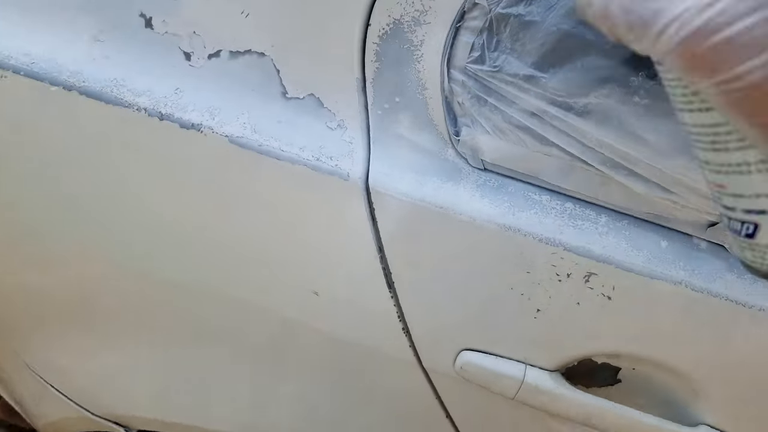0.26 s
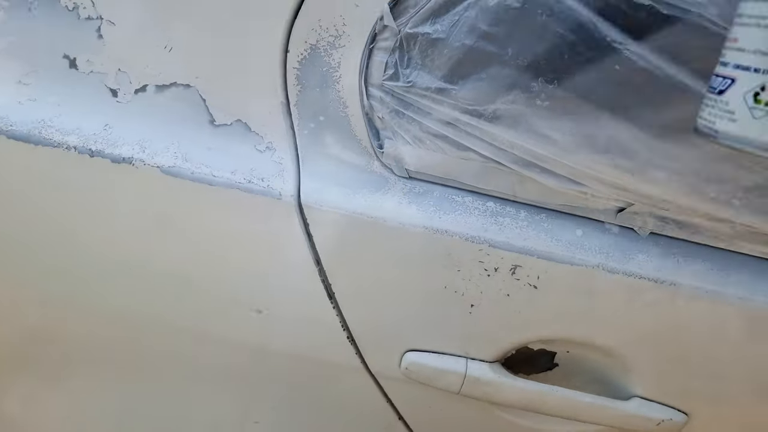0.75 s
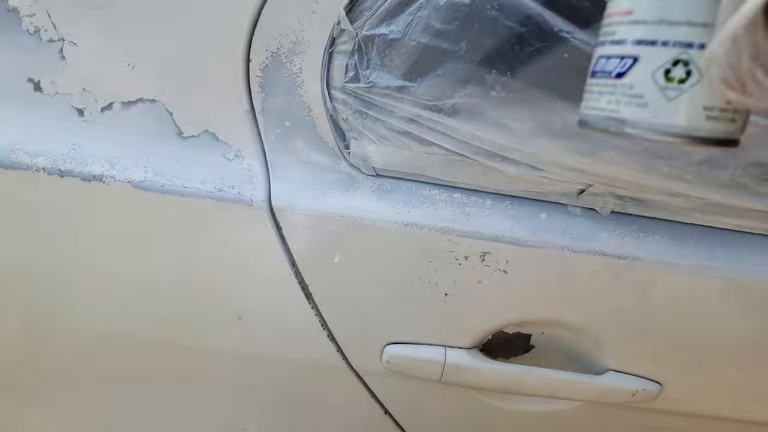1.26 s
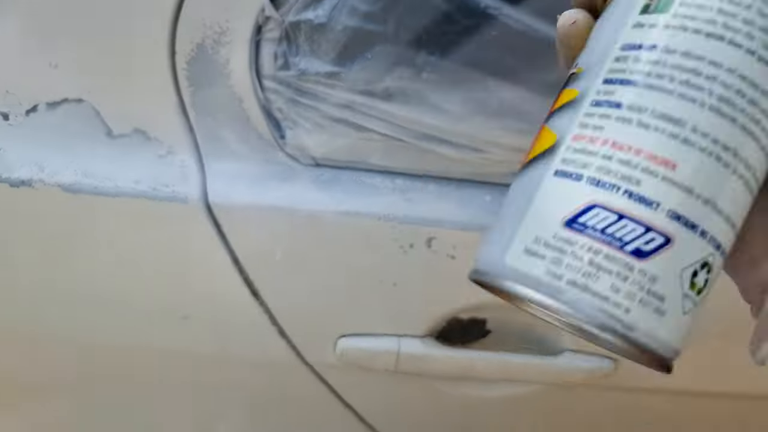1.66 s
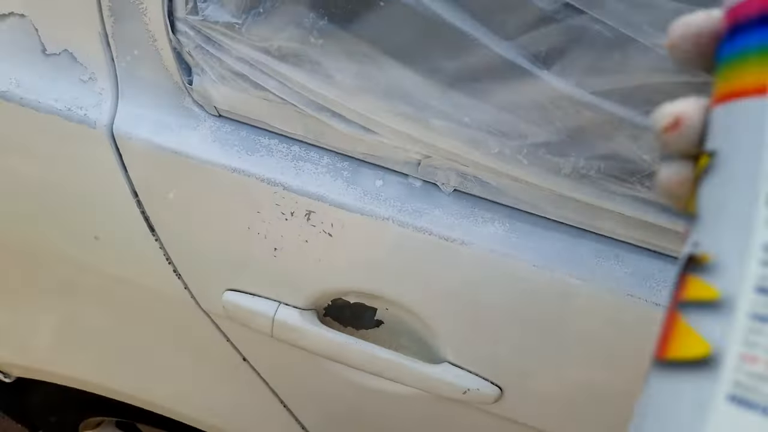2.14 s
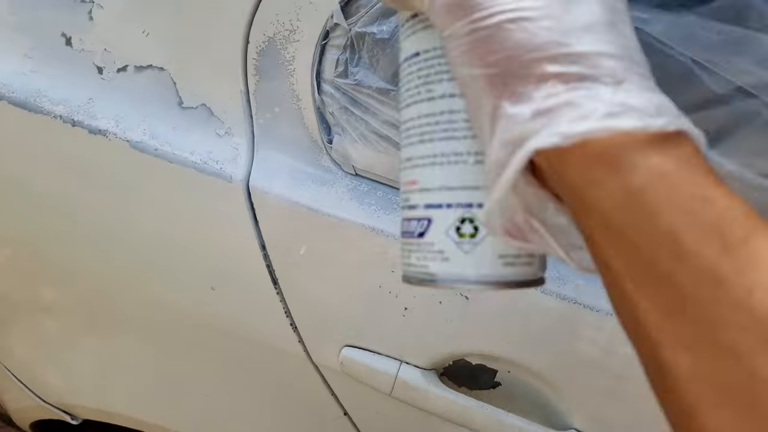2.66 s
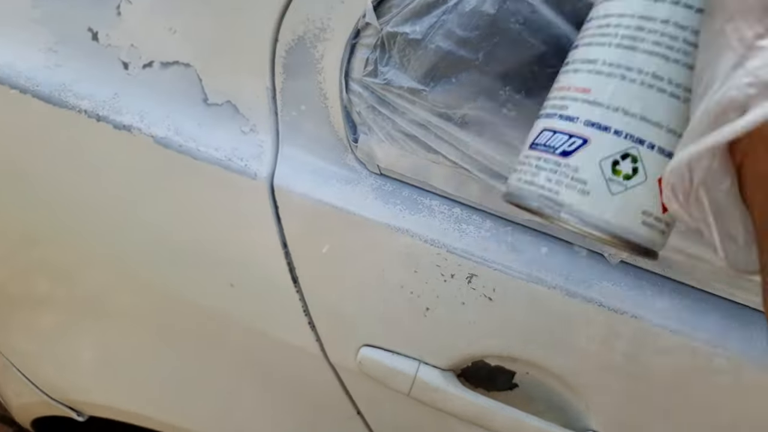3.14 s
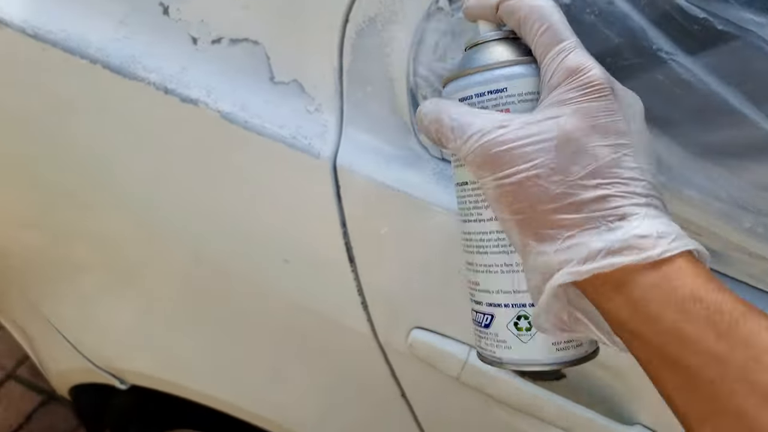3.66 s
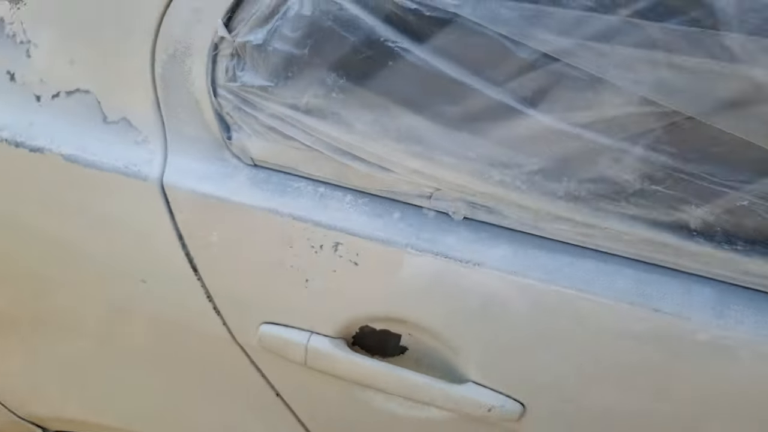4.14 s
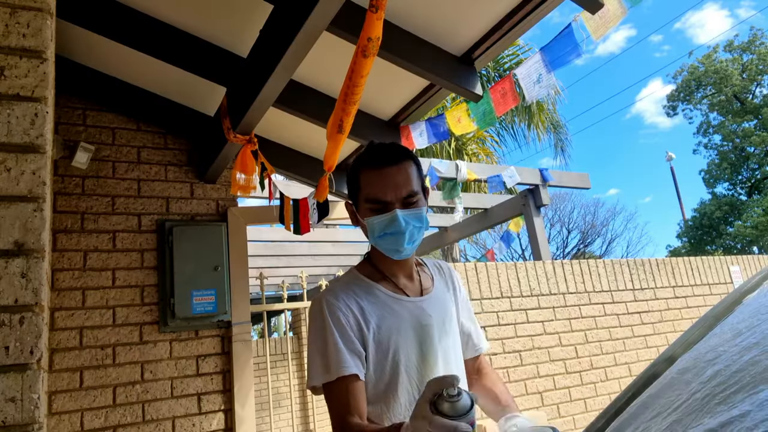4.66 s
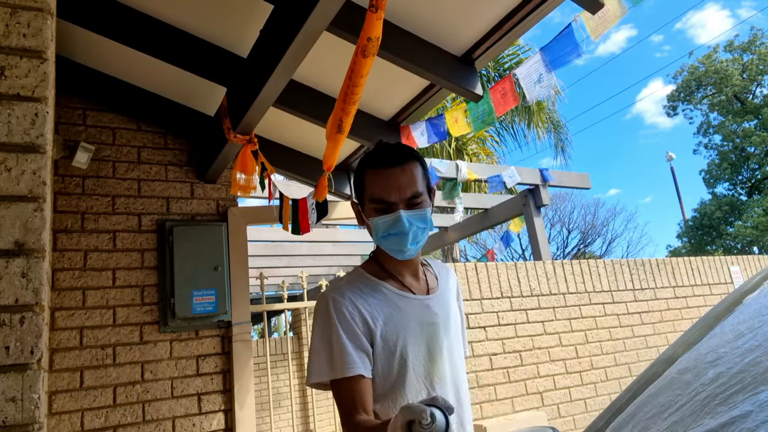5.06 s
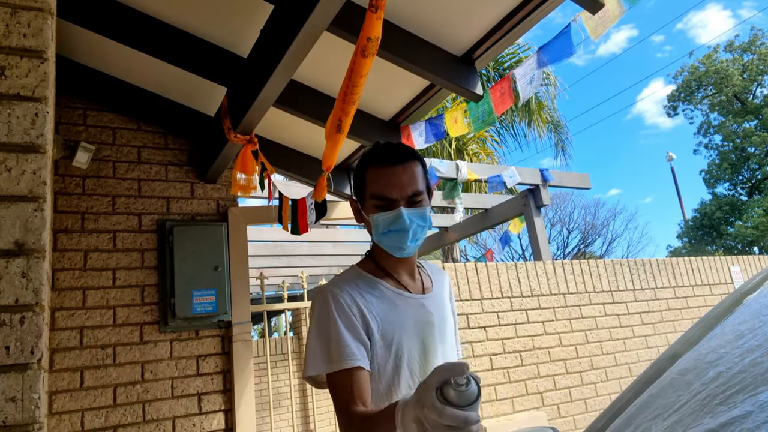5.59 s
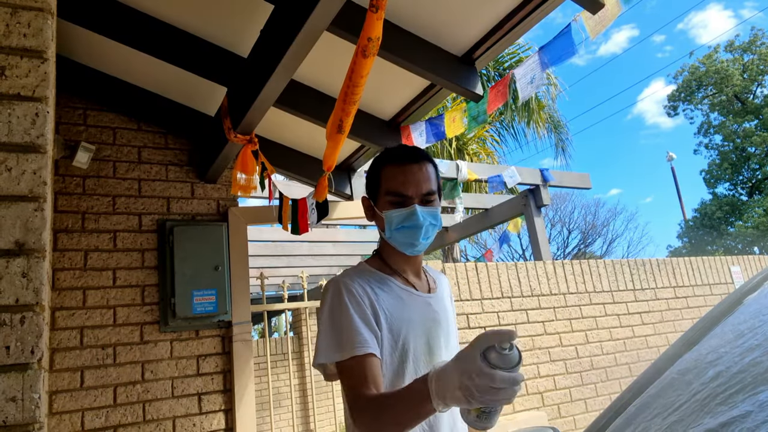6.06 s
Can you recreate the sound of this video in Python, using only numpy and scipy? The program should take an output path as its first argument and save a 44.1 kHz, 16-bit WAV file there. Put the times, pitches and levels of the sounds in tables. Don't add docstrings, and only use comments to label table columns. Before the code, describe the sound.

Hard metallic ticks of a loose ball and quick bursts of bright hiss from an aerosol can, then duller, more distant strokes and two soft panel knocks.

```python
import sys
import numpy as np
from scipy import signal
from scipy.io import wavfile
from scipy.ndimage import uniform_filter1d

SR = 44100
rng = np.random.default_rng(int(sys.argv[2]) if len(sys.argv) > 2 else 0)


def gain_from_db(level_db):
    decades = np.asarray(level_db, float) / 20
    return 10 ** decades


def unload_wav(signal):
    wavfile.write(
        sys.argv[1],
        SR,
        np.round(np.clip(np.atleast_2d(signal).T, -1, 1) * 32767).astype(np.int16),
    )


N = 278712
CUT_S = 4.315

# frequency in Hz, density in dB per Hz.
NEAR_HISS = [(410, -44), (700, -22.5), (1690, -14), (2010, -18), (2760, -9), (2990, -17), (4160, -10),
             (5070, -7), (6430, -11), (7940, -5.5), (9060, -17.5), (14400, 2.5), (15800, -8.5),
             (16400, -51)]
# frequency in Hz, density in dB per Hz.
FAR_HISS = [(410, -38), (700, -10.5), (1570, -14.5), (2120, -11), (2690, -4), (3460, -7.5), (4380, -3),
            (6100, -10), (7630, -4), (9060, -10.5), (13500, 3.5), (15800, -2.5), (16400, -61)]
# frequency in Hz, share of the left-right difference.
SHADOW = [(1000, 0.045), (3000, -0.098), (5000, 0.23), (9000, -0.032), (13000, 1.)]
# start in seconds, end in seconds, hiss level in dB.
QUICK_STROKES = [(0.289, 0.357, -32.5), (0.466, 0.548, -32.5), (0.639, 0.72, -36.5), (0.809, 0.895, -35.5),
                 (1.004, 1.044, -36), (1.15, 1.232, -34.5), (1.307, 1.391, -34.5), (1.487, 1.584, -37)]
SLOWER_STROKES = [(2.544, 2.613, -38), (2.72, 2.818, -39), (2.926, 3.019, -37.5), (3.13, 3.224, -38),
                  (3.327, 3.429, -37.5), (3.569, 3.632, -36.5), (3.764, 3.852, -34.5), (3.963, 4.045, -35)]
# start in seconds, end in seconds, hiss level in dB.
DISTANT_STROKES = [(4.734, 4.799, -43), (4.88, 4.964, -42.5), (5.08, 5.176, -40.5), (5.256, 5.35, -43),
                   (5.443, 5.51, -42.5), (5.607, 5.677, -43.5), (5.756, 5.838, -43.5),
                   (5.931, 6.013, -43.5), (6.103, 6.192, -44.5), (6.278, 6.322, -46)]
# start in seconds, end in seconds, level in dB.
RUSTLES = [(0.984, 0.997, -56), (1.698, 1.72, -66), (2.17, 2.306, -67.5), (2.645, 2.672, -61.5),
           (3.875, 3.925, -59), (4.462, 4.575, -57), (4.585, 4.722, -63), (5.424, 5.44, -51)]

# time in seconds, peak in dB, strongest ring in Hz, left-right difference in dB.
BLOWS = [(0.0245, -12, 7580, 6), (0.03, -17, 5370, -1), (0.1167, -17, 4040, 0.5), (0.173, -8, 1610, 8.5),
         (0.231, -16.5, 4120, 8.5), (0.3784, -18, 5230, 2), (0.8066, -10, 2440, 14.5),
         (0.8497, -18.5, 4280, -3), (1.007, -16, 4430, 1.5), (1.3262, -17, 5330, -22.5),
         (1.3346, -15, 6000, 3.5), (1.6415, -5.5, 4730, 4.5), (1.645, -18, 3100, 7), (1.7675, -10, 1720, 3),
         (1.772, -22.5, 1700, 3), (1.87, -19.5, 2460, 4), (1.8924, -9, 4100, 5.5),
         (1.9692, -16.5, 4010, 12), (2.3143, -7.5, 4344, 10.5), (2.3216, -11, 2680, -2),
         (2.381, -14.5, 5800, -1), (2.386, -21, 4700, -10), (2.406, -11, 2400, 10.5),
         (2.8421, -7, 4620, 4.5), (3.0565, -7.5, 4230, 6.5), (3.2686, -10.5, 4860, 8),
         (3.588, -14, 4940, -5.5), (3.6514, -18.5, 4370, 2), (3.858, -10, 7840, -6),
         (4.0908, -15.5, 4590, 8)]
# time in seconds, peak in dB, strongest ring in Hz.
TAPS = [(0.191, -30.5, 2480), (0.2594, -21.5, 2480), (0.3516, -22, 7550), (0.3657, -23, 2260),
        (0.5198, -17, 5480), (0.5346, -23.5, 2590), (0.8912, -22.5, 4240), (0.92, -24, 4170),
        (0.9855, -30.5, 2260), (1.1497, -20.5, 2360), (1.166, -21.5, 2370), (1.1945, -24, 7250),
        (1.307, -27, 3360), (1.705, -26.5, 1320), (1.829, -20.5, 1850), (1.8893, -31, 4000),
        (1.9986, -29, 1390), (2.0152, -20.5, 5080), (2.5414, -19.5, 2280), (2.568, -26, 2360),
        (2.6018, -22.5, 1510), (2.7578, -24, 4460), (2.788, -21, 7820), (2.9447, -26.5, 1330),
        (3.0927, -23, 2420), (3.4416, -26.5, 4640), (3.6104, -20, 1700), (3.643, -27, 6000),
        (4.123, -30.5, 1700)]
# time in seconds, peak in dB.
TOUCHES = [(0.5764, -39), (0.5864, -38), (0.5954, -37), (1.0597, -29), (1.094, -42), (1.398, -28.5),
           (1.7109, -29.5), (1.929, -32), (2.1944, -35), (2.437, -29), (2.658, -35.5), (2.69, -41),
           (3.693, -31.5), (3.707, -33.5), (3.7327, -32.5), (4.159, -33.5), (4.189, -36), (4.3059, -31.5)]
# time in seconds, peak in dB, strongest ring in Hz.
FAR_TICKS = [
    (5.219, -34.5, 7450),
    (5.3432, -26, 4620),
    (5.458, -24, 2820),
    (5.5873, -18, 5030),
    (5.593, -25, 2970),
    (5.7298, -30.5, 3780),
]
# frequency in Hz, level in dB, 60 dB decay in seconds.
TIN_MODES = [(2500, 0, .005), (3400, -3, .005), (4400, -1, .004), (5300, -2, .004), (6500, -4, .004),
             (7700, -4, .003)]
# time in seconds, level in dB, pitch in Hz.
SQUEAK = [
    (2.355, -51, 3200),
    (2.361, -33, 3260),
    (2.372, -34, 3570),
    (2.38, -34, 3200),
]
# time in seconds, peak in dB, left-right difference in dB.
KNOCKS = [
    (4.929, -20.5, 1),
    (5.0966, -14, 1.5),
]
# frequency in Hz, level in dB, 60 dB decay in seconds.
PANEL_MODES = [(263, -8, 0.027), (320, -6, 0.045), (453, 0, 0.029), (526, -2.5, 0.025), (623, -5, 0.017),
               (800, -5, 0.016), (1060, -2.5, 0.017), (1280, 0, 0.0089), (1700, -4.5, 0.0092),
               (2220, -4, 0.013), (2590, -7.5, 0.012), (3295, -4.5, .008)]

# frequency in Hz, density in dB per Hz.
RUMBLE = [(12, -34.5), (20, -20.5), (38, -4.5), (54, 2), (97, -7.5), (161, -17), (221, -17), (274, -35),
          (330, -43.5), (430, -54), (730, -120)]
# frequency in Hz, density in dB per Hz.
AIR = [(120, -23), (200, -9.5), (485, -16), (639, -20), (812, -20), (1070, -18), (1310, -19), (1490, -19.5),
       (2500, -23), (4040, -31.5), (10700, -43.5), (15200, -44), (16400, -67)]
# time in seconds, level in dB.
TRAFFIC_BEFORE = [(0.0, -33.5), (0.3, -32.5), (2.4, -29.5), (2.7, -35), (3.0, -29.5), (4.31, -30.7)]
TRAFFIC_AFTER = [(4.33, -45.5), (4.402, -35), (4.944, -33.5), (6.286, -38), (6.32, -36.5)]
# frequency in Hz, left-right correlation.
LIKENESS = [(60, 0.94), (180, 0.96), (550, 0.52), (1650, -0.34), (4970, 0.28), (15000, -0.48)]
# time in seconds, level in dB.
DRONE = [
    (1.7, -57),
    (2.05, -55),
    (2.6, -51.5),
    (2.8, -74),
]

NEAR_LAG, FAR_LAG = 13.2, 4.97
NO_BASS = signal.butter(4, 1100, "high", fs=SR, output="sos")


def hiss():
    def level_db(hz, t):
        body = np.clip((10500 - hz) / 2000, 0, 1)
        shapes = []
        for spectrum in (NEAR_HISS, FAR_HISS):
            top_shape = unit(spectrum, hz, 11900, 16000)
            body_shape = unit(spectrum, hz, 2500, 6200)
            shapes.append((1 - body) * top_shape + body * body_shape)
        power = np.full((2, len(hz), len(t)), 1e-14)
        for stroke in strokes():
            s, *columns = np.transpose(outline(*stroke))
            on = (t > s[0]) & (t < s[-1])
            top_db, body_db, pan_db = (np.interp(t[on], s, c) for c in columns)
            mid_db = top_db + body * body_db
            side_db = pan_db * read(SHADOW, hz) / 2
            power[:, :, on] += gain_from_db(2 * np.array([mid_db + side_db, mid_db - side_db]))
        return 10 * np.log10(power) + np.where(t < CUT_S, *shapes) + 6.68
    return field(256, level_db, lambda hz: 0.25 + 0 * hz, port_delay, patchy_db=3.0, flicker_db=1.82)


def strokes():
    bouts = [  # rows, swell over the stroke dB, body against the top dB, left-right dB
        (QUICK_STROKES, -1.7, -5.6, -12.5),
        (SLOWER_STROKES, 1.4, -5, -11.5),
        (DISTANT_STROKES, -3, -4, 5.2),
        (RUSTLES, 0.3, 3, 2.1)]
    return [(start, end, db - swell / 2, db + swell / 2, body_db, pan_db)
            for rows, swell, body_db, pan_db in bouts for start, end, db in rows]


def outline(start, end, first_db, last_db, body_db, pan_db):
    # drop time s, drop dB, end time s, end dB
    wisp = (0.014, -31.5, 0.11, -49) if start < CUT_S else (-0.05, -12.5, 0.11, -40)
    drop_s, drop_db, gone_s, gone_db = wisp
    return [(start - 0.009, first_db - 45, body_db - 1, pan_db),
            (start - 0.004, first_db - 12.5, body_db + 6.0, pan_db),
            (start + 0.002, first_db, body_db, pan_db),
            (end - 0.004, last_db, body_db, pan_db),
            (end + drop_s, last_db + drop_db, body_db + 10.5, 0.4 * pan_db),
            (end + gone_s, last_db + gone_db, body_db - 1.5, 0.29 * pan_db)]


def port_delay(hz, t):
    near, far = (np.exp(-2j * np.pi * hz * lag / SR) for lag in (NEAR_LAG, FAR_LAG))
    return np.where(t < CUT_S, near, far)


def hits():
    out = [(s, db, hz, -5.5, -19, pan_db, NEAR_LAG) for s, db, hz, pan_db in BLOWS]
    out += [(*row, -9, -21, 2, NEAR_LAG) for row in TAPS]
    out += [(*row, rng.uniform(1190, 2880), -21, -19, -4, NEAR_LAG) for row in TOUCHES]
    out += [(s, db, rng.uniform(4000, 7600), -8, -8, 2, NEAR_LAG)
            for s, end, db in QUICK_STROKES + SLOWER_STROKES]
    return out + [(*row, -34, -19, 3.5, FAR_LAG) for row in FAR_TICKS]


def tick(peak_db, hz, low_db, top_db, pan_db, lag):
    t = np.arange(800) / SR
    common, *own = rng.standard_normal((3, len(t)))
    fall = np.exp(-(t / 0.0019) ** 2) + 0.16 * np.exp(-t / 0.0045)
    force = (1 - np.exp(-t / 0.0004)) * fall
    blow = (common + 1.37 * np.array(own)) * force
    wall = struck(blow, TIN_MODES, 0.09, rng.standard_normal((len(TIN_MODES), 2)))
    pure = resonate(force * np.sin(2 * np.pi * hz * t), hz, 900)
    spot = 0.6 * peaked(resonate(blow, hz, 1100)) + pure
    hollow = resonate(resonate(blow, 1520, 800), 1520, 800)
    spit = resonate(resonate(blow, 13300, 2700), 13300, 2700)
    sheen = resonate(blow, 7200, 2700)
    shell = 0.74 * peaked(wall) + 0.43 * peaked(spot) + 0.32 * peaked(blow) + 0.14 * peaked(sheen)
    out = peaked(shell) + gain_from_db(low_db + 0.5) * peaked(hollow) + gain_from_db(top_db + 0.5) * peaked(spit)
    out = signal.sosfilt(NO_BASS, out)
    out[1] = np.roll(out[1], round(lag))
    return gain_from_db(peak_db + 3.0 + np.array([[pan_db], [-pan_db]]) / 2) * out


def struck(blow, modes, spread, colour):
    t = np.arange(blow.shape[1]) / SR
    ring = np.zeros(len(t))
    for (hz, db, t60), (weight, detune) in zip(modes, colour):
        decay = gain_from_db(db + 2.5 * weight - 60 * t / t60)
        ring += decay * np.sin(2 * np.pi * hz * (1 + spread * detune) * t)
    return signal.fftconvolve(blow, ring[None], axes=1)[:, :len(t)]


def grit():
    out = np.zeros((2, N))
    for start, end, first_db, last_db, body_db, pan_db in strokes():
        if start >= CUT_S:
            continue
        for where, size, pitch, side in rng.random((3, 4)):
            peak_db = last_db + body_db + 1.0 + 2.1 * size - 6.3 * (where > 0.7)
            crackle = tick(peak_db, 2200 + 4000 * pitch, -10, -20, 10 * side - 5, NEAR_LAG)
            add(out, start + where * 1.2 * (end - start), crackle)
    return out


def squeak():
    s, db, hz = np.transpose(SQUEAK)
    t = np.arange(s[0], s[-1], 1 / SR)
    hz = np.interp(t, s, hz)
    slips = rng.standard_normal((2, len(t)))
    whistle = evened(resonate(resonate(slips, hz, 600), hz, 600))
    return s[0], gain_from_db(np.interp(t, s, db) - 3.0) * whistle


def knock(peak_db, pan_db):
    t = np.arange(6000) / SR
    rattle = 0.48 * np.exp(-t / 0.0043) + 0.09 * np.exp(-t / 0.039)
    shake = rng.standard_normal((3, len(t))) * rattle
    blow = np.exp(-((t - 0.0004) / 0.00008) ** 2) + shake[0] + 0.22 * shake[1:]
    out = struck(blow, PANEL_MODES, 0.037, 0.21 * rng.standard_normal((len(PANEL_MODES), 2)))
    out = signal.sosfilt(signal.butter(3, 260, "high", fs=SR, output="sos"), out)
    return gain_from_db(peak_db + 4.0 + np.array([[pan_db], [-pan_db]]) / 2) * peaked(out)


def carport(x):
    t = np.arange(6000) / SR
    signs = rng.choice([-1., 1.], (2, len(t)))
    present = (rng.random((2, len(t))) < 0.045) * (t > 0.004)
    taps = signs * present * gain_from_db(-60 * t / 0.11)
    return signal.oaconvolve(x, taps / np.linalg.norm(taps[0]), axes=1)[:, :N]


def background():
    s, rumble_db = np.transpose(TRAFFIC_BEFORE + TRAFFIC_AFTER)
    air_db = -52 + 1.27 * (rumble_db + 32) * (s > CUT_S)

    def same(hz):
        return read(LIKENESS, hz)

    def no_lag(hz, t):
        return 1

    def rumble_level(hz, t):
        return unit(RUMBLE, hz, 25, 250) + 0 * t

    def air_level(hz, t):
        absent = (t > CUT_S) * np.clip(2.2 - (t - CUT_S) / 0.07, 0, 1)
        octaves = np.clip(np.log2(hz / 700 + 1e-9), 0, 2.5)
        return unit(AIR, hz, 300, 900) - 6 * absent * octaves

    rumble = field(2048, rumble_level, same, no_lag, patchy_db=2.0, flicker_db=1.2, count=48)
    air = field(512, air_level, same, no_lag, patchy_db=2.5, flicker_db=1.5)
    t = np.arange(N) / SR
    both = gain_from_db(np.interp(t, s, rumble_db) + 11.5) * rumble + gain_from_db(np.interp(t, s, air_db) + 2.5) * air
    drone = rng.standard_normal((2, N))
    for sharpness in (8.0, 12.0):
        drone = signal.lfilter(*signal.iirpeak(1350, sharpness, fs=SR), drone)
    both += gain_from_db(np.interp(t, *np.transpose(DRONE), -120, -120)) * evened(drone)
    return both * gain_from_db([[0.4], [-0.4]])


def field(size, level_db, same, turn, patchy_db, flicker_db, count=None):
    hop = size // 4
    hz = np.fft.rfftfreq(size, 1 / SR)[:count, None]
    t = np.arange(N // hop + 5) * hop / SR
    a, b, c, d, patches = rng.standard_normal((len(t), len(hz), 5), dtype=np.float32).T
    patches = uniform_filter1d(patches, size=6, axis=0)
    patches = evened(uniform_filter1d(patches, size=10, axis=1))
    flicker = evened(uniform_filter1d(rng.standard_normal(len(t)), size=2))
    same = np.clip(same(hz), -1, 1)
    left = a + 1j * b
    right = same * left * turn(hz, t) + np.sqrt(1 - same ** 2) * (c + 1j * d)
    z = np.zeros((2, size // 2 + 1, len(t)), np.complex64)
    level = gain_from_db(level_db(hz, t) + patchy_db * patches + flicker_db * flicker)
    z[:, :len(hz)] = np.array([left, right]) * level
    return signal.istft(z, nperseg=size, noverlap=size - hop)[1][:, :N] / np.sqrt(size)


def resonate(x, hz, width):
    turn = np.exp(2j * np.pi * np.cumsum(hz * np.ones(x.shape[-1])) / SR)
    r = np.exp(-np.pi * width / SR)
    return 2 * (turn * signal.lfilter([1 - r], [1, -r], x / turn + 1e-18)).real


def read(points, hz):
    f, value = np.transpose(points)
    return np.interp(np.log(hz + 1), np.log(f + 1), value)


def unit(points, hz, lo, hi):
    db = read(points, hz)
    return db - 10 * np.log10(np.mean(gain_from_db(2 * db) * (hz > lo) * (hz < hi)))


def evened(x):
    return x / np.sqrt(np.mean(x ** 2) + 1e-20)


def peaked(x):
    return x / abs(x).max()


def add(mix, s, sound):
    part = mix[:, round(s * SR):][:, :sound.shape[1]]
    part += sound[:, :part.shape[1]]


def scene():
    can = hiss()
    for s, db, hz, low_db, top_db, pan_db, lag in hits():
        hollow_db = low_db - 16 * np.log2(hz / 1600)
        add(can, s, tick(db, hz, hollow_db, top_db, pan_db, lag))
    add(can, *squeak())
    knocks = np.zeros((2, N))
    for s, *row in KNOCKS:
        add(knocks, s, knock(*row))
    can += grit()
    return can + knocks + carport(gain_from_db(-21.5) * can + gain_from_db(-5.0) * knocks) + background()


def starve(x, under_db):
    hz, t, z = signal.stft(x, SR, nperseg=2048)
    power = (abs(z[:, :1024]) ** 2).sum(0)
    power = power.reshape(128, 8, -1).mean(1)
    weak = power < gain_from_db(-2 * under_db) * uniform_filter1d(power, size=9, axis=0)
    treble = uniform_filter1d((np.diff(x) ** 2).sum(0), size=128)
    padded = np.pad(treble, (1024, 3072))
    frames = np.lib.stride_tricks.sliding_window_view(padded, 2048)[::1024][:len(t)]
    steady = frames.max(1) < 6 * frames.mean(1)
    dropped = np.repeat(weak & steady, 8, axis=0) & (hz[:1024, None] > 2500)
    z[:, :1024] *= np.where(dropped, 0.03, 1.)
    return signal.istft(z, SR, nperseg=2048)[1][:, :N]


def top_cut(x):
    return signal.sosfilt(signal.butter(12, 16650, fs=SR, output="sos"), x)


def record(dry):
    t = np.arange(N) / SR
    since = np.maximum(t - CUT_S - 0.008, 0)
    mute = np.exp(-(since / 0.02) ** 2) * (t > CUT_S)
    edited = np.tanh(dry) * (1 - mute)
    low_pass = signal.firwin(401, 15750, window=("kaiser", 7), fs=SR)
    limited = signal.oaconvolve(edited, low_pass[None], "same")
    finished = starve(limited, under_db=3.3)
    return top_cut(finished)


dry = scene()
out = record(dry)
unload_wav(out)
```